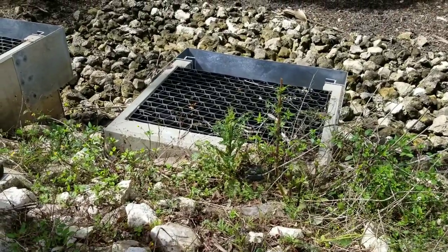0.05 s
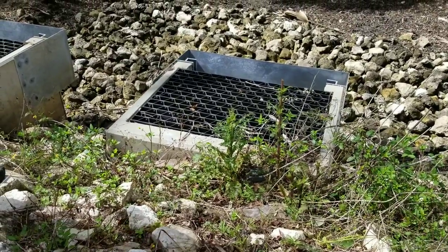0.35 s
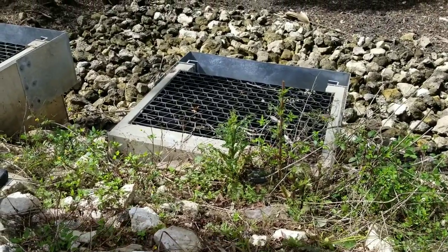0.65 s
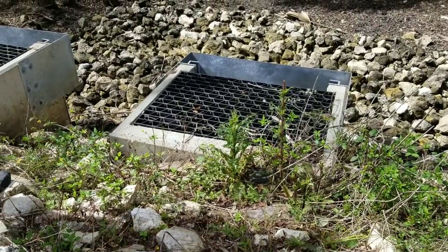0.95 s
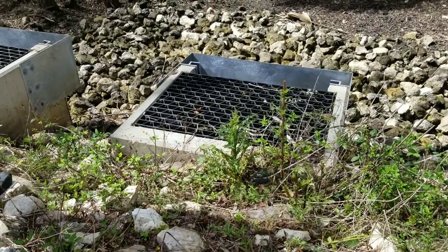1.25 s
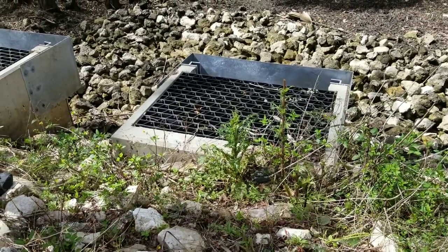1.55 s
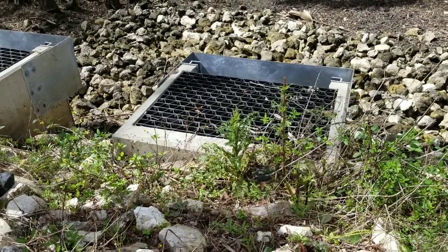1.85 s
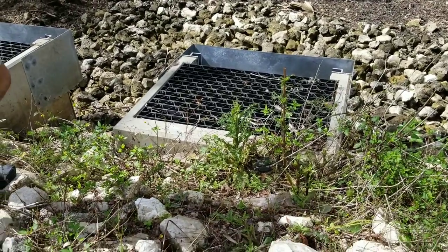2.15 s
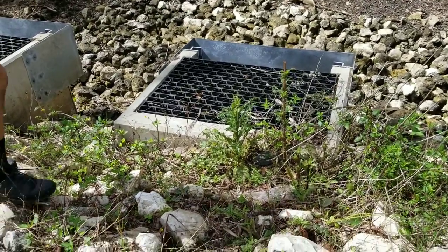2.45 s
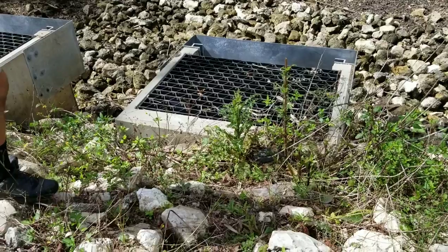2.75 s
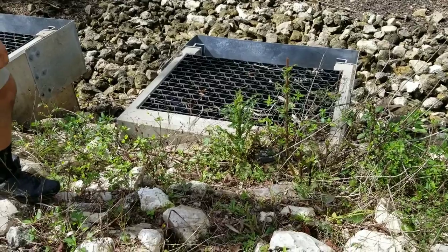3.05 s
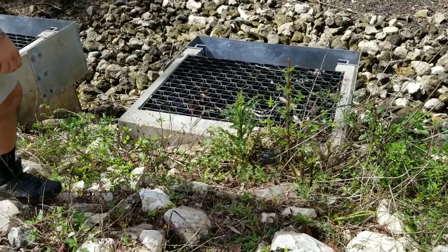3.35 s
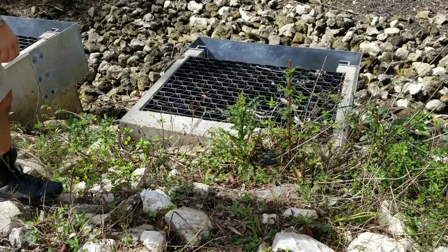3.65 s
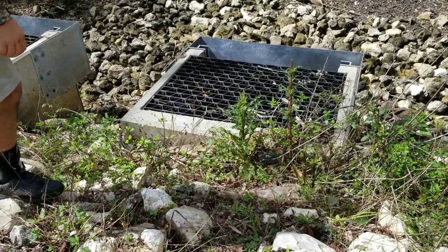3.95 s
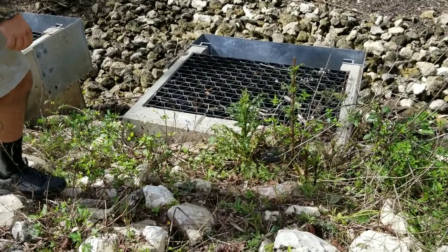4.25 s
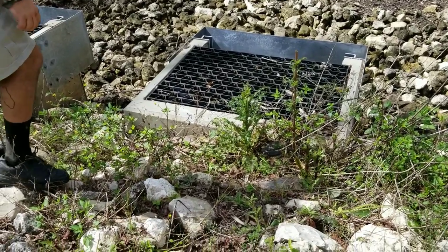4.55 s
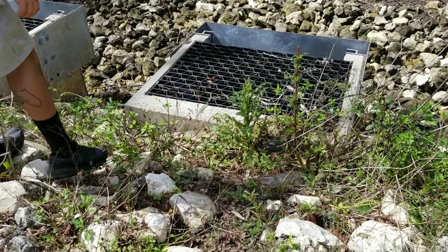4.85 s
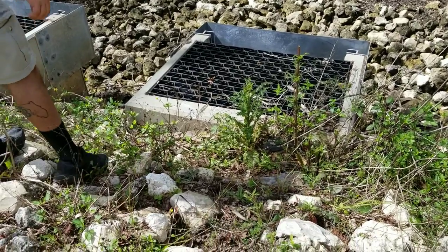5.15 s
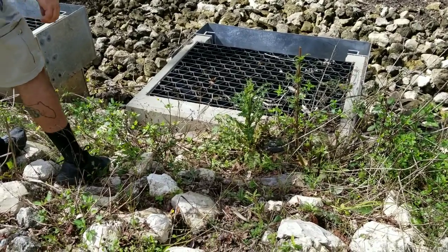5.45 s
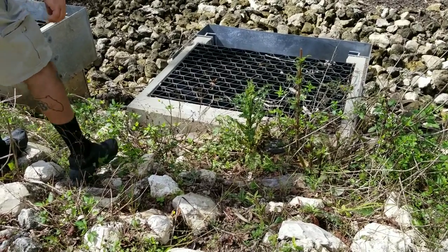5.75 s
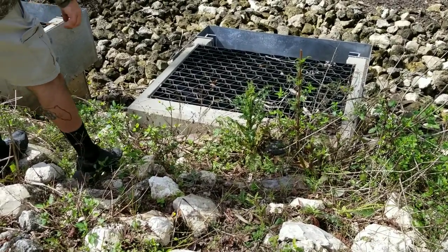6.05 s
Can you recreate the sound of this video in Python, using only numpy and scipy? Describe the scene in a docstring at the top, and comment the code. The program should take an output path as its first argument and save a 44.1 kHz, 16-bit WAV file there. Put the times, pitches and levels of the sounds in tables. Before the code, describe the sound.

Boots pick a slow, uneven way through dry weeds and over loose rocks, close to the microphone. The first steps crunch with a short scuff and sharp stone clacks. Lighter crackling and single stalk snaps follow, with another clack about two seconds in and firmer crunches soon after and near four seconds. The last steps are soft and gritty. A faint low rumble and a far engine lie underneath, outdoors.

```python
"""Boots pick a slow way through dry weeds and over loose rocks, close by.
Each step crushes stalks (crackle, single snaps) and grinds grit under the sole; now and then it scuffs
or knocks a stone. The rocks around scatter a very short tail.
A low rumble, a far engine and a faint hiss of air lie underneath."""
import sys
import numpy as np
from scipy import signal
from scipy.fft import rfft, irfft, next_fast_len
from scipy.io import wavfile
from scipy.ndimage import uniform_filter1d

SR = 44100
rng = np.random.default_rng(int(sys.argv[2]) if len(sys.argv) > 2 else 0)


def put_to_file(sound):
    """Save the sound as 16-bit audio at rate SR, in the file named by the first command-line argument."""
    columns = np.atleast_2d(sound).T  # one column per channel
    safe = np.clip(columns, -1, 1)
    whole_steps = np.round(safe * 32767)
    wavfile.write(sys.argv[1], SR, whole_steps.astype(np.int16))


N = 278271
TIME_S, HIT_S = np.arange(N) / SR, np.arange(2600) / SR

# A boot lands or shifts its weight: (time of full pressure [s], build-up [s], hold [s], release [s],
# weeds [dB], grit [dB], extra fizz of thin leaves [dB])
FOOTFALLS = [(0.073, 0.09737, 0.04719, 0.03768, -41, -48.5, -1),
             (0.362, 0.04481, 0.10603, 0.09575, -44.5, -54, 0),
             (0.963, 0.04295, 0.01249, 0.0706, -59, -64.5, -1),
             (1.341, 0.06912, 0.011328, 0.05145, -52.5, -68, -1),
             (1.822, 0.17095, 0.18886, 0.03735, -50.5, -61, 2.0),
             (2.072, 0.02556, 0.02248, 0.0577, -58, -50.5, -2.5),
             (2.277, 0.19, 0.018054, 0.0693, -50, -57.5, -1),
             (2.539, 0.0632, 0.01195, 0.05049, -41, -54, 2), (2.696, 0.13, 0.18277, 0.03085, -62.5, -64, 3),
             (2.958, 0.061, 0.12514, 0.02777, -72, -68.5, 7.5),
             (3.459, 0.05544, 0.045, 0.038, -51, -62.5, -0.5),
             (3.615, 0.00938, 0.01135, 0.07424, -49.5, -64, -0.5),
             (3.792, 0.062, 0.06853, 0.09307, -48.0, -56.5, 1.0),
             (4.1, 0.028182, 0.05368, 0.05089, -39.5, -48.5, 0.5),
             (4.423, 0.095, 0.01143, 0.1099, -52.5, -61, 0.5),
             (4.619, 0.04087, 0.03924, 0.0158, -47.5, -51, 3),
             (4.761, 0.1893, 0.14656, 0.03219, -69.5, -62.0, 2),
             (5.052, 0.01672, 0.1077, 0.0322, -67.5, -62.5, 2.5),
             (5.19, 0.01579, 0.18276, 0.04326, -56.5, -66.0, 3),
             (5.419, 0.04524, 0.11917, 0.02996, -62, -61, 3), (5.592, 0.036, 0.108, 0.02714, -60, -56, 3),
             (5.825, 0.02504, 0.03015, 0.07223, -57, -59, 3.5),
             (6.051, 0.158, 0.0927, 0.01994, -60.5, -68, 2), (6.21, 0.159, 0.0248, 0.1729, -63, -62, 3)]


def gain_of(db):
    """Decibels to amplitude."""
    return 10 ** (np.asarray(db) / 20)


def unit_rms(x):
    """Scale to rms 1."""
    return x / np.sqrt(np.mean(x ** 2) + 1e-20)


def unit_energy(x):
    """Scale each channel to energy 1."""
    return x / np.sqrt(np.sum(x ** 2, axis=-1, keepdims=True) + 1e-20)


def log_interp(points, hz):
    """Interpolate (frequency [Hz], value) points over log frequency."""
    point_hz, value = np.transpose(points)
    return np.interp(np.log(hz + 1), np.log(point_hz + 1), value)


def envelope(points):
    """Gain per sample from (time [s], level [dB]) points."""
    return gain_of(np.interp(TIME_S, *np.transpose(points)))


def coloured(x, colour):
    """Filter by (frequency [Hz], gain [dB]) points."""
    size = next_fast_len(N, True)
    response = gain_of(log_interp(colour, np.fft.rfftfreq(size, 1 / SR)))
    return irfft(rfft(x, size) * response, size)[..., :N]


def add(mix, start_s, sound):
    """Mix a short sound into both channels."""
    part = mix[:, max(round(start_s * SR), 0):][:, :sound.shape[-1]]
    part += sound[..., :part.shape[1]]


def noise_pair(size, apart):
    """Stereo white noise: a shared part plus independent parts of relative size apart."""
    noise = rng.standard_normal((3, size))
    return noise[0] + apart * noise[1:]


def burst(decay_s, apart):
    """Brittle break: noise with instant onset and exponential decay."""
    return unit_energy(noise_pair(len(HIT_S), apart) * np.exp(-HIT_S / decay_s))


def fracture(rise_s, apart):
    """Progressive break: noise swells and dies; the channels differ in the treble."""
    age = HIT_S / rise_s
    noise = rng.standard_normal((3, len(HIT_S)))
    treble = signal.lfilter(*signal.butter(1, 1500, "highpass", fs=SR), noise[1:])
    return unit_energy((noise[0] + apart * treble) * age * np.exp(-age))


def ring(hz, t60_s):
    """One struck mode."""
    return unit_energy(np.sin(2 * np.pi * hz * HIT_S) * gain_of(-60 * HIT_S / t60_s))


def grains(per_s, spread_db, cap, band_hz, t60_cycles, decay_s, apart):
    """Tiny fractures of uneven size, each a crack and a short ring."""
    out = np.zeros((2, N))
    kinds = [(burst(decay_s, apart) + 0.3092 * ring(hz, t60_cycles / hz))[:, :512]
             for hz in np.geomspace(*band_hz, 48)]
    size = gain_of(spread_db * np.minimum(rng.exponential(1, N), cap))
    kind = rng.integers(0, len(kinds), N)
    for at in np.flatnonzero(rng.random(N) < per_s / SR):
        add(out, at / SR, size[at] * kinds[kind[at]])
    return out


def rumble():
    """Distant rumble that swells and sinks, nearly alike in both channels."""
    levels = [(0, -54), (.4, -58.5), (.6, -55), (.9, -56), (1.15, -62), (1.35, -55.5), (2.6, -56),
              (3.2, -60.5), (4.3, -57.5), (4.75, -55), (5.6, -58), (6.31, -62.5)]  # slow trend: (time [s], level [dB])
    spectrum = [(15, -32), (30, -9.5), (50, -1.5), (68, 1.5), (95, -0.5), (125, -1.5), (160, -4), (215, -7),
                (280, -9.5), (420, -22), (900, -46.5), (3000, -48)]  # rumble: (frequency [Hz], level [dB])
    swell_db = unit_rms(coloured(rng.standard_normal(N), [(1, 0), (6, 0), (20, -40), (60, -120)]))
    noise = unit_rms(coloured(noise_pair(N, apart=0.4401), spectrum))
    return envelope(levels) * gain_of(swell_db) * noise


def engine():
    """Wavering drone; distance leaves only the lowest three orders."""
    running = [(0, 66, -78), (0.621, 69, -55), (1.1, 68, -68), (1.999, 68, -80.5), (2.298, 67.2, -55.5),
               (2.599, 66, -55.5), (2.899, 69, -69), (3.999, 78.5, -57), (4.9, 81, -62), (5.5, 76, -82),
               (6.31, 71, -61.5)]  # far engine: (time [s], firing rate [Hz], level [dB])
    time_s, firing_hz, level_db = np.transpose(running)
    waver = unit_rms(coloured(rng.standard_normal(N), [(1, -0.5), (6, -1), (20, -53), (60, -120)]))
    cycles = np.cumsum(np.interp(TIME_S, time_s, firing_hz) * (1 + 0.02515 * waver)) / SR
    orders = sum(gain_of(db) * np.sin(2 * np.pi * k * cycles) for k, db in [(1, 0), (2, -11), (3, -15)])
    flutter_db = 2.116 * np.roll(waver, N // 2)
    return envelope(np.c_[time_s, level_db]) * gain_of(flutter_db) * unit_rms(orders)


def air():
    """Faint hiss of open air."""
    spectrum = [(100, -10.5), (500, -2), (900, -8.5), (1500, -14.5), (4000, -20.5), (9000, -17),
                (16000, -11.5)]  # hiss: (frequency [Hz], level [dB])
    return gain_of(-66) * unit_rms(coloured(noise_pair(N, apart=1), spectrum))


def rock_scatter(x, level_db, decay_s):
    """Nearby rocks return a short diffuse tail, unrelated in the two channels."""
    tail = rng.standard_normal((2, len(HIT_S))) * np.exp(-HIT_S / decay_s) * (HIT_S > .002)
    return signal.oaconvolve(x, gain_of(level_db) * unit_energy(tail), axes=1)[:, :N]


def boot_pressure(peaks_db, rest_db, linger=1):
    """Each step builds, holds and lets go, then stalks and grit settle; steps add in power."""
    settle_db, settle_s = -31, 0.088
    power = gain_of(rest_db) ** 2
    t = TIME_S[::64]
    for (full_s, build_s, hold_s, release_s, *_), db in zip(FOOTFALLS, peaks_db):
        rise = np.exp(-np.maximum(full_s - t, 0) / build_s)
        after = np.maximum(t - full_s - hold_s, 0) / linger
        fall = np.maximum(np.exp(-after / release_s), gain_of(settle_db) * np.exp(-after / settle_s))
        power = power + (gain_of(db) * rise * fall) ** 2
    return np.interp(TIME_S, t, np.sqrt(power))


def scrapes():
    """Rubber drags grit over stone: uneven slips in one broad resonance; once a boot lands with a low thud."""
    # Sole scuffs, and at 2.545 s a boot landing with a low thud: (midpoint [s], nominal length [s], centre
    # [Hz], bandwidth [Hz], level [dB])
    scuffs = [(.164, 0.024, 1751, 450, -37), (0.196, .022, 1655, 299.3, -48.5),
              (0.258, .08, 1730, 280.4, -56.5), (2.274, 0.09494, 627.8, 400.6, -58),
              (2.545, 0.05236, 269, 258.7, -51.5), (4.584, 0.04266, 462.3, 357.6, -49.5),
              (4.626, 0.08418, 867.3, 1224, -49.5), (4.623, 0.058, 1994, 1211, -54.5),
              (5.669, 0.073, 842.2, 449, -62), (5.876, 0.12238, 1170, 824, -60),
              (6.119, 0.08366, 1272, 784.1, -59)]
    out = np.zeros((2, N))
    for mid_s, length_s, hz, width_hz, db in scuffs:
        size = round(1.5 * length_s * SR)
        friction = noise_pair(size, apart=0.2436)
        slip_db = 6.634 * unit_rms(uniform_filter1d(rng.standard_normal(size), size=120))
        edges_hz = [max(hz - width_hz / 2, 60), hz + width_hz / 2]
        band = signal.butter(2, edges_hz, "bandpass", fs=SR, output="sos")
        scuff = unit_rms(signal.sosfilt(band, friction * gain_of(slip_db)))
        add(out, mid_s - size / SR / 2, gain_of(db) * scuff * np.hanning(size))
    return out


def grit():
    """Small stones and soil grind under the sole and settle more slowly than the weeds."""
    colour = [(80, -15), (170, -22.5), (260, 2.5), (480, 0.5), (680, -2.5), (900, 2), (1250, -4),
              (1700, -11), (3000, -7), (8000, -10.5)]  # grit spectrum: (frequency [Hz], gain [dB])
    *_, grit_db, _ = np.transpose(FOOTFALLS)
    crunch = grains(per_s=800, spread_db=4.5, cap=1.3925, band_hz=(368.05, 2121.4),
                    t60_cycles=8.128, decay_s=0.003308, apart=0.7543)
    return boot_pressure(grit_db, rest_db=-89.5, linger=2.1967) * unit_rms(coloured(crunch, colour))


def stone_knocks():
    """Stone meets stone: a crack, a hard clack, and a thud as it rocks in its bed."""
    # Impacts: (time [s], clack pitch [Hz], thud [dB], clack [dB], crack [dB], nominal crack length [s])
    impacts = [(0.1542, 1724, -21.5, -2, -2.5, 0.0003656), (0.1811, 2189, -43.5, -5.5, -16, 0.000799),
               (0.4678, 1931, -0.5, -1.5, 6, 0.0006655), (1.329, 1861, -31, -21.5, -28, 0.000897),
               (1.347, 2081, -32.5, -35.5, -17.5, 0.001067), (2.0723, 2339, -4.5, -5, -1, 0.0006922),
               (3.9229, 2079, -23.5, -14.5, -12.5, 0.000943), (4.4583, 1729, -20, -9.5, -12.5, 0.000301)]
    bed_modes = [(337, -16, 0.01927), (507.1, 5.5, 0.0101), (596.43, 4, 0.0733), (778.6, -2, 0.04355)]  # rocking stone: (frequency [Hz], level [dB], t60 [s])
    out = np.zeros((2, N))
    for time_s, hz, thud_db, clack_db, crack_db, length_s in impacts:
        detune = rng.uniform(.98, 1.02)
        bed = unit_energy(sum(gain_of(db) * ring(f * detune, t60_s) for f, db, t60_s in bed_modes))
        soil_push = ring(570.74 * detune, t60_s=0.007362)
        thud = unit_energy(soil_push + gain_of(-5) * bed)
        side_modes = 0.1302 * ring(hz * 0.59, t60_s=0.0096) + 0.252 * ring(hz * 1.4715, t60_s=0.00844)
        clack = unit_energy(ring(hz, t60_s=0.006135) - side_modes)
        onset = fracture(0.628 * length_s, apart=0.5035)
        crack = unit_energy(onset + gain_of(0.5) * burst(decay_s=0.004217, apart=0.6927))
        add(out, time_s, gain_of(thud_db) * thud + gain_of(clack_db) * clack + gain_of(crack_db) * crack)
    bass_cut = signal.butter(3, 230, "highpass", fs=SR, output="sos")  # small stones radiate little bass
    colour = [(330, -8.5), (900, -1), (2000, -8), (5000, -5.5), (9000, -4), (15000, -6)]
    return coloured(signal.sosfilt(bass_cut, out), colour)


def stalk_snaps():
    """A stalk breaks: a crack rings the stem, then fibres tear."""
    breaks = [(0.0478, -9, 4374, 3.5), (0.0669, -8, 2814, 0.5), (.314, -20, 4470, 5),
              (0.3387, -9, 4658, 5.5), (.363, -13, 4338, 2.5), (0.4147, -16, 4068, 4),
              (.488, -18, 4950, -7), (.5245, -20, 4026, 7), (.5814, -26, 3920, -12.5),
              (.9559, -27, 2829, 9), (1.2276, -32.5, 4008, -3.5), (1.243, -31.5, 4503, -9.5),
              (1.31, -24.5, 5144, 11), (1.3472, -16.5, 4414, 10), (1.462, -24.5, 5183, 8.5),
              (1.516, -22.5, 4722, -3.5), (1.631, -25.5, 4754, -3), (1.734, -21.5, 3754, -29.5),
              (1.7839, -23.5, 2230, -6.5), (1.8948, -21, 2413, -8.5), (2.1142, -14, 4015, -6),
              (2.141, -17, 5314, 1), (2.1975, -24, 2612, 5.5), (2.4545, -21.5, 5392, -15),
              (2.513, -11, 5286, 1), (2.6936, -14.5, 3058, -7), (2.7224, -28, 3182, -12.5),
              (2.753, -29.5, 4353, -11), (2.776, -27.5, 4393, 1), (2.884, -23, 3530, -3.5),
              (3.0069, -26.5, 4033, -18.5), (3.299, -25, 7260, -10), (3.3934, -31.5, 2992, -5.5),
              (3.4124, -23, 3109, -5.5), (3.4582, -25, 4020, -9), (3.8755, -15, 5290, 5),
              (3.9731, -22, 5230, 10.5), (4.0764, -16.5, 4914, -1.5), (4.1948, -17, 4189, 14),
              (4.3487, -25, 3661, 12), (4.4407, -20, 2734, 3), (4.459, -14, 4576, 4.5),
              (5.2614, -26, 3023, 4), (5.389, -17, 5033, -2.5), (5.4292, -20, 3642, -2.5),
              (5.8261, -24, 5283, 0), (6.216, -27, 6801, 10.5)]  # stalks: (time [s], level [dB], stem pitch [Hz], ring re crack [dB])
    out = np.zeros((2, N))
    for time_s, db, stem_hz, ring_db in breaks:
        rise_s = .00035 * 2 ** ((db + 23.5) / 13.5)  # louder = thicker stalk = slower break
        drive = fracture(rise_s, apart=0.5759)
        stem = signal.fftconvolve(drive, ring(stem_hz, t60_s=0.00361)[None], axes=1)
        stem = unit_energy(stem[:, :len(HIT_S)])
        snap = unit_energy(fracture(rise_s, apart=0.95) + gain_of(ring_db) * stem)
        tearing = gain_of(-13.5) * burst(decay_s=0.00324, apart=1)
        add(out, time_s - rise_s, gain_of(db) * (snap + tearing))
    return coloured(out, [(200, -19), (1300, -19), (2600, -2), (5000, -4.5), (9000, 4.5), (15000, 6.5)])


def patchy(x, depth_db):
    """Leaves and stalks take turns: each band swells and fades by itself."""
    *_, spectra = signal.stft(x, SR, nperseg=256)
    drift = uniform_filter1d(rng.standard_normal(spectra.shape[1:]), size=9, axis=0)
    drift = unit_rms(uniform_filter1d(drift, size=14, axis=1))
    return signal.istft(spectra * gain_of(depth_db * drift), SR, nperseg=256)[1][:, :N]


def weeds():
    """Dry stalks crackle in clumps, denser the harder they are crushed, over a rustle of leaves."""
    colour = [(500, -54.5), (1200, -5), (2200, -1.5), (3300, -1.5), (4500, 0), (6000, -2), (8500, -1),
              (11000, -2), (13000, -2), (16000, -4.5)]  # weed spectrum: (frequency [Hz], gain [dB])
    *_, crush_db, _, fizz_db = np.transpose(FOOTFALLS)
    crush = boot_pressure(crush_db, rest_db=-83)
    fizz = boot_pressure(crush_db + fizz_db, rest_db=-83)
    density = np.clip(unit_rms(crush), .05, 3) ** .6
    # One failing stem drags others along.
    clumps = unit_rms(uniform_filter1d(uniform_filter1d(rng.standard_normal(N), size=260), size=120))
    per_s = 750 * density * gain_of(4 * np.clip(clumps, -2, 2))
    crackle = grains(per_s, spread_db=5.2, cap=3.2, band_hz=(2200, 14000),
                     t60_cycles=14, decay_s=.0008, apart=.9)
    crackle = unit_rms(crackle / np.sqrt(density))
    rustle = gain_of(-8) * unit_rms(noise_pair(N, apart=.9))
    twigs = grains(per_s=35 * density, spread_db=3, cap=2, band_hz=(2600, 6500),
                   t60_cycles=16, decay_s=.0011, apart=1)
    twigs = gain_of(-13.5) * unit_rms(twigs / np.sqrt(density))
    stalks = unit_rms(coloured(patchy(crackle + rustle + twigs, depth_db=2.5), colour))
    leaves = coloured(stalks, [(3000, -58), (5500, -6), (8000, 4.5), (16000, 6.5)])
    return crush * stalks + (fizz - crush) * leaves


def scene():
    """Steps and their scatter over the background."""
    steps = weeds() + grit() + scrapes() + stalk_snaps() + stone_knocks()
    return steps + rock_scatter(steps, level_db=-8, decay_s=0.0030227) + rumble() + engine() + air()


def record(dry):
    """Two microphone ports colour the sound, then a low-pass; the right port hears every source a little later."""
    ports = [(254.35, 0, -0.5, 0), (521.2, -1, -1.5, -0.4362), (903.2, -0.5, 2.5, -0.354),
             (1146.6, -3, -0.5, 0.6743), (1328.7, 1.5, 0.5, 2.5), (1905.1, 4.5, 6, 0.7583),
             (2439.7, 5.5, -7, 4), (3531.6, 5.5, 2, 4.5), (5011.2, -1, 7.5, 7.5), (5381, 5.5, 0, 6),
             (6594.4, 1, 2, 7), (8210, -8, -5.5, 7), (10895, -2.5, -1, 7), (12524, 1.5, 1, 7.5)]  # response: (frequency [Hz], left [dB], right [dB], extra right lag [rad])
    right_delay_s, cutoff_hz = .000227, 15900
    hz, left_db, right_db, extra_rad = np.transpose(ports)
    bins_hz = np.fft.rfftfreq(N, 1 / SR)
    lag_rad = log_interp(np.c_[hz, extra_rad], bins_hz) + 2 * np.pi * bins_hz * right_delay_s
    left = gain_of(log_interp(np.c_[hz, left_db], bins_hz))
    right = gain_of(log_interp(np.c_[hz, right_db], bins_hz)) * np.exp(-1j * lag_rad)
    picked_up = irfft(rfft(dry) * np.array([left, right]), N)
    low_pass = signal.firwin(255, cutoff_hz, window=("kaiser", 9), fs=SR)
    return signal.oaconvolve(picked_up, low_pass[None], "same")


dry = scene()
out = record(dry)
put_to_file(out)
```